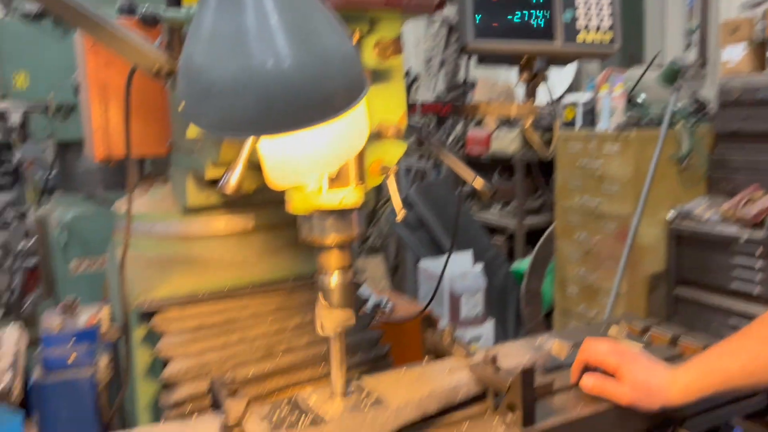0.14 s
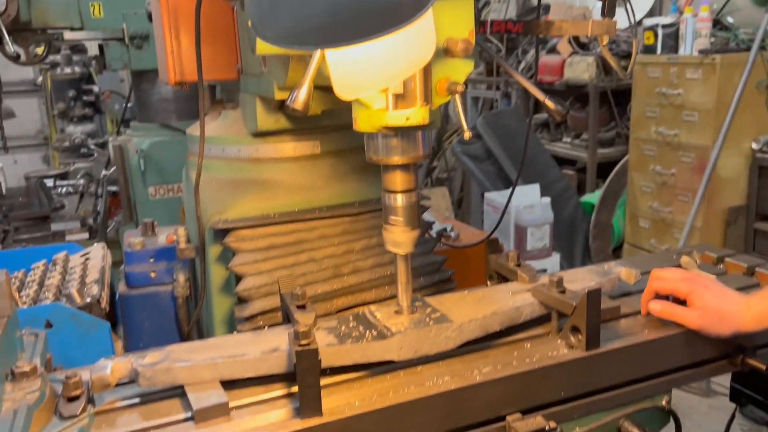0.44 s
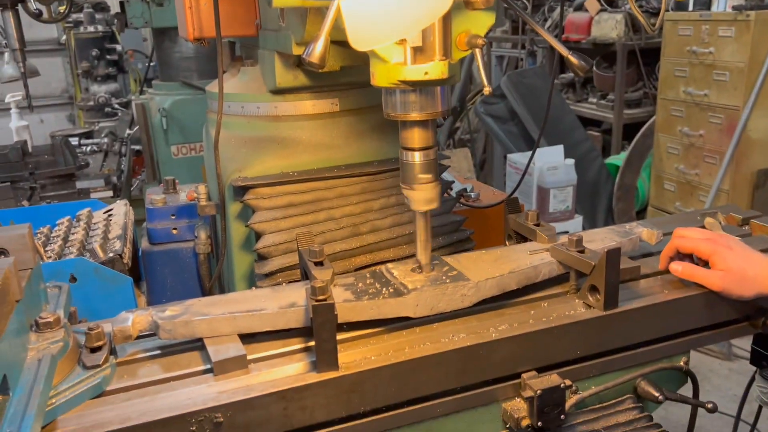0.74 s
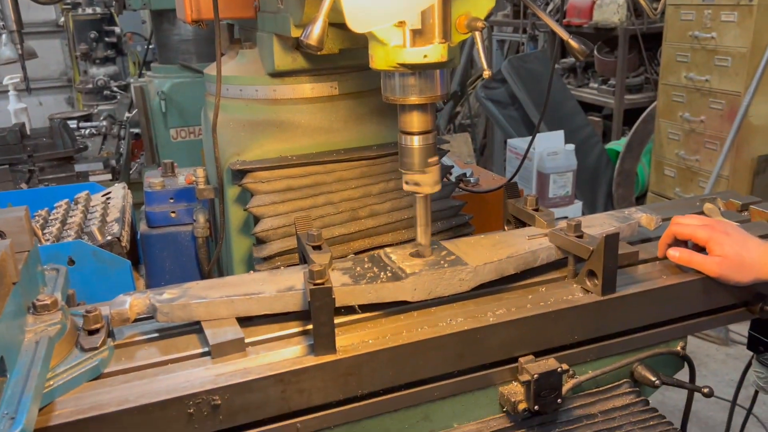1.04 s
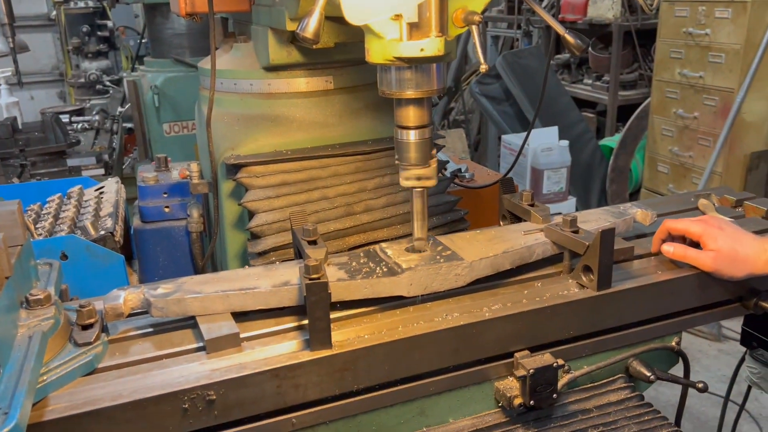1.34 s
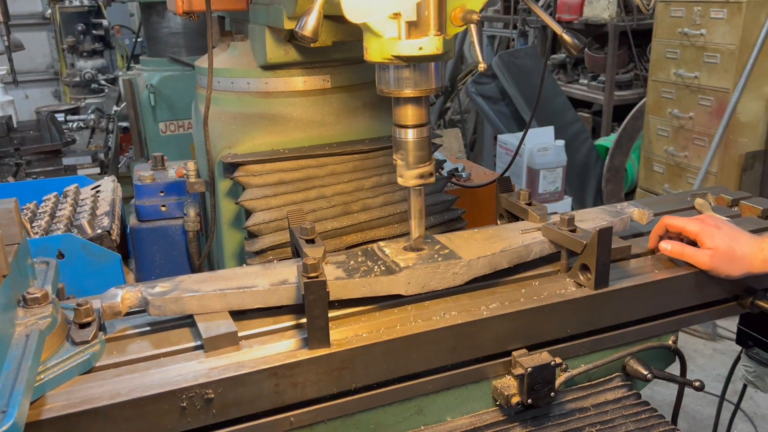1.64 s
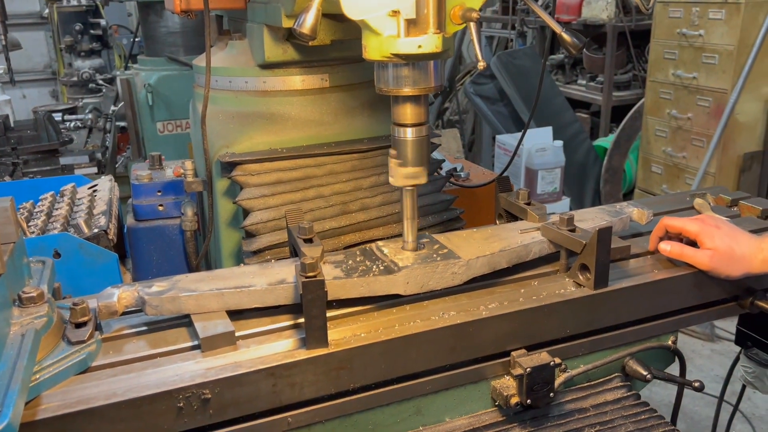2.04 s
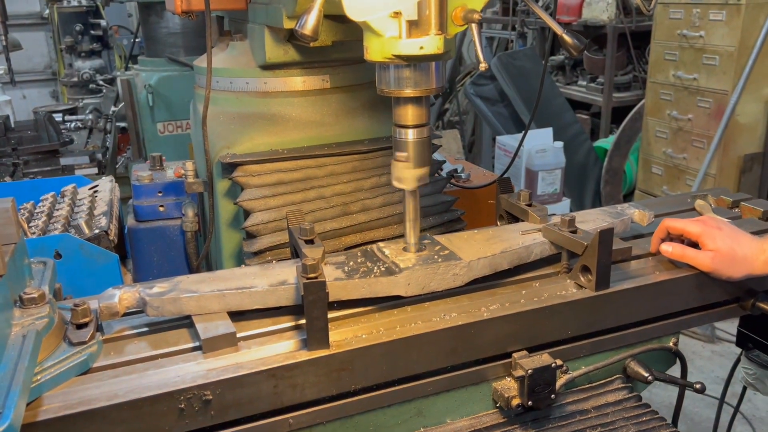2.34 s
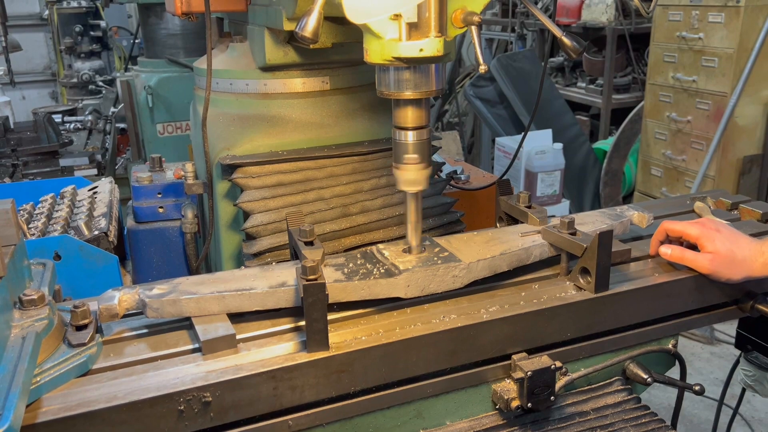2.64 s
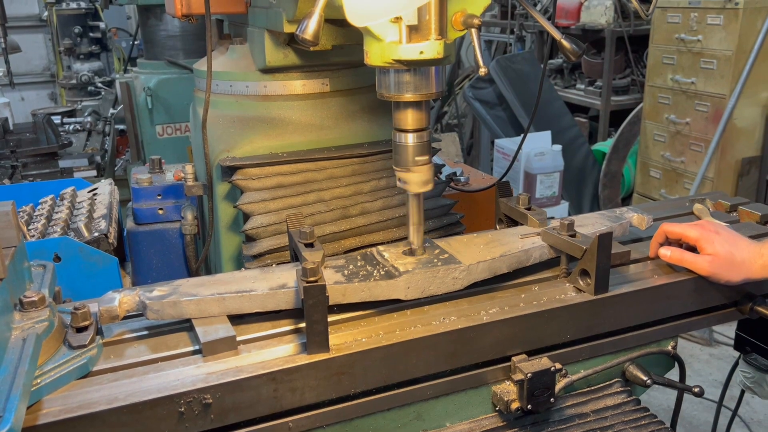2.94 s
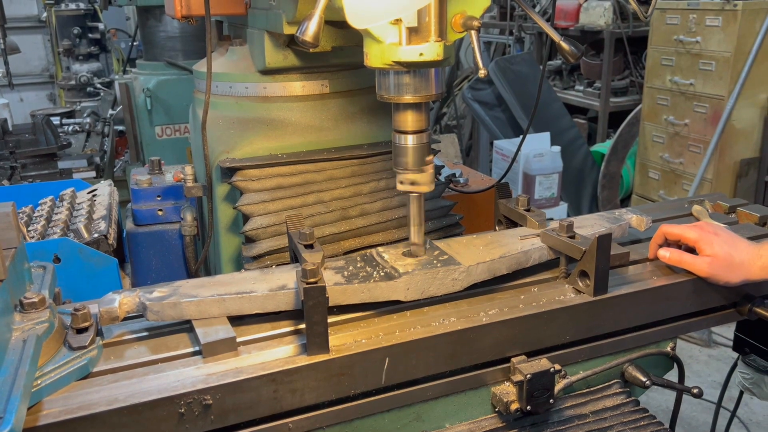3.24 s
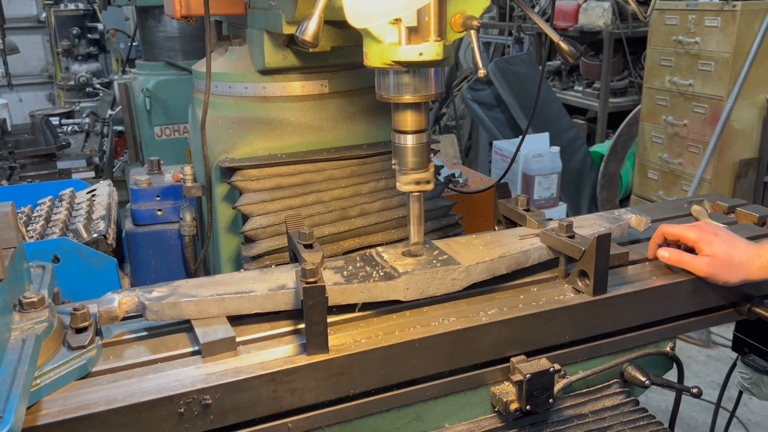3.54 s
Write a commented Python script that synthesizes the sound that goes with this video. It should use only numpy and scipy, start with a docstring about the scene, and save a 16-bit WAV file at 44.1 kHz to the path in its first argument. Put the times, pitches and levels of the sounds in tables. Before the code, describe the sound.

A milling machine whines and rumbles steadily, about a metre from a phone microphone in a workshop. Its belt ticks lightly and a rasp swells regularly, while a chip breaks off a metal bar with one tiny, sharp click.

```python
"""A vertical milling machine in a workshop, a metre from a phone with two microphone ports.
It runs throughout: gears and belt cogs whine over a rumble that partly repeats with each belt turn,
each slow drive beat and every second spindle turn, and a rasp swells with that beat. A few whines
shift as the phone swings and settles. From 0.2 s the belt ticks twice a turn. A chip snaps off the
bar at 1.5 s, and a much fainter one at 2.1 s."""
import sys
import numpy as np
from scipy import signal
from scipy.fft import rfft, irfft
from scipy.io import wavfile
from scipy.ndimage import uniform_filter1d

SR = 44100
rng = np.random.default_rng(int(sys.argv[2]) if len(sys.argv) > 2 else 0)


def store_wav(level_fs):
    """Save 16-bit WAV to argv[1]."""
    pcm = np.round(np.clip(np.atleast_2d(level_fs), -1, 1) * 32767)
    wavfile.write(sys.argv[1], SR, pcm.T.astype(np.int16))


N = 163170
RASP_PEAK_S, RASP_DB = .5, 3.5  # the rasp's tones and noise swell together


def undb(db):
    """Decibels to amplitude."""
    return 10 ** (np.asarray(db) / 20)


def on_log(table, column, hz):
    """Read a column of a table along a log frequency axis."""
    table = np.array(table, float)
    return np.interp(np.log(np.maximum(hz, 1)), np.log(table[:, 0]), table[:, column])


def walk(rate_hz):
    """Random levels held 1 / rate_hz seconds and smoothed twice; spread near 1."""
    held = np.repeat(rng.standard_normal(int(N * rate_hz / SR) + 2), repeats=16)
    slewed = uniform_filter1d(uniform_filter1d(held, size=16), size=16)
    return 1.3 * np.interp(np.arange(N) * 16 * rate_hz / SR, np.arange(len(held)), slewed)


def tones(table):
    """Stereo tones that waver slowly in level and phase and tremble a little, the high ones more."""
    t, out = np.arange(N) / SR, np.zeros((2, N))
    settled_s, drifts_s = 1.7, 2.3  # the phone's swing dies out; a last drift begins
    for hz, db, pan_db, lead, *shift_db in table:
        loose = np.sqrt(min(hz, 6000) / 2000)
        phase = 2 * np.pi * (hz * t + rng.random())
        phase += loose * (.3 * walk(rate_hz=4) + .12 * walk(rate_hz=40))
        tone = np.sqrt(2) * undb(db + 1.3 * loose * walk(rate_hz=4)) * np.exp(1j * phase)
        if shift_db:
            tone *= undb(np.interp(t, [0, settled_s, drifts_s, N / SR], [shift_db[0], 0, 0, shift_db[1]]))
        to_left = undb(pan_db / 2) * np.exp(.5j * lead)
        out[0] += (tone * to_left).imag
        out[1] += (tone / to_left).imag
    return out


def drive_beat(at_s, db, period_s=.664):
    """Gain that swings by db with the slow beat of the drive, plus a smaller swing at twice the rate."""
    turn = 2 * np.pi * (np.arange(N) / SR - at_s) / period_s
    return undb(db * (np.cos(turn) + .6 * np.cos(2 * turn)))


def drive_whine():
    """Shafts, gear teeth and belt cogs hum and whine at multiples of their turning rates."""
    # Tones of the machine: pitch_hz, level_db, left_minus_right_db, left_lead_rad
    motor = [(111.8, -38.5, -1, -0.12), (166.4, -46, -2, -0.15), (223.5, -45, 0, -0.044),
             (279.4, -41.5, -4, 0.19), (337.6, -46, -3, 0.54), (564, -55, 5, 0.5)]  # multiples of the motor shaft's turn
    gears = [(1216.8, -56, 18, 0.0), (1285.4, -33, -5, -0.9), (1357.6, -54, 8, 0.6), (2502.4, -60, 1, 0.6),
             (2639.0, -50, 0, 1.1), (3787.0, -64, 9, 0.7), (5077.8, -62, 9, 0.6), (5346.8, -63, 7, -0.5),
             (6358.4, -66, 4, -0.1), (6426.4, -63, -3, -0.9), (6495.4, -68, -3, 0.2)]  # gear mesh, its overtones and side tones
    cogs = [(324.5, -44, -7, .4), (364, -51, -3, 0.15), (423, -46, 7, 0.71), (431, -43, -8, 0.83),
            (522.3, -46.5, -1, 0.7), (528.2, -36.5, 2, 0.016), (869, -46.5, -3, .5), (857, -47, -1, .2),
            (1050, -47, 12, 0.26), (1578, -51, 7, 0)]  # multiples of the belt's turn
    spindle = [(3119.2, -61, 6, 1.4), (3430.8, -57, -3, 1.7), (5013.5, -65, 7, 2.7), (5638.4, -68, 4, -2.7),
               (6886.2, -65, 5, -.2), (7462.7, -67, -2, -.9), (7774.6, -67, 3, -1), (8133.8, -67, 2, -1.2),
               (8445.9, -62, 2, -1.2), (8681.1, -66, 2, -1.6), (9381.6, -67, 0, -3.14),
               (10299.5, -70, 0, 3.14), (12404.3, -72, 0, .2)]  # high multiples of the spindle's turn
    head = [(120.3, -58, -4, -0.4), (129.8, -50, -1, 0), (150.5, -47, -1, 0.2), (161.8, -51, -3, -0.5),
            (388, -43, -5, 0.2), (539.7, -41.5, 2, 0.4), (1954.6, -52, 2, .8), (2305.7, -59, 2, -.9),
            (2708.4, -55.5, 0, .7), (3636.2, -60, 4, 0), (3683, -58.5, 6, .6)]  # further hums and whines of the head
    rasping = [(1670.5, -51, 3, .9), (1673.2, -47, 1, .6), (1685.4, -50, 1, .4), (1727.8, -49.5, 2, .9),
               (1730.8, -49, 3, .3), (1785, -54, 0, .2)]  # a cluster that swells with the rasp
    # The same columns, then: extra_at_start_db, extra_at_end_db
    shifting = [(2570.7, -49, 4, -.6, -9, 1), (2807.8, -56, 1, 1.9, -4, 2), (2971.9, -58, -1, .8, -1, 6),
                (5141.5, -54, 5, -.8, 6, 0), (5209.5, -59, 5, .5, -10, 0)]  # whines that change as the phone swings and settles
    dipping = [(5277.4, -57.5, 8, .1, -5, 0), (5302.6, -59, 9, 0, -11, 0)]  # two spindle whines that drop out together
    whine = tones(motor + gears + cogs + spindle + head + shifting)
    whine += drive_beat(at_s=.58, db=-5) * tones(dipping)
    return whine + drive_beat(RASP_PEAK_S, RASP_DB) * tones(rasping)


def rattle():
    """Spectrum of broad noise: part fresh, part echoing itself one period earlier."""
    # Noise that repeats with each belt turn, each slow drive beat and every second spindle turn:
    # period_s, memory_ratio, centre_hz, width_octaves, power_share, throb_hz, throb_depth_ratio
    repeats = [(.15755, 0.86, 460, 1.1, 0.57, 6.347, 0.16), (.66205, 0.68, 1710, 0.098, 0.32, 55.89, 0.23),
               (.08335, 0.82, 8100, 1.04, 0.28, 12., 0.09), (.66205, 0.69, 160, 0.74, 0.5, 55.89, 0.46)]
    rasp_row = 1
    hz, t = np.arange(N // 2 + 1) * SR / N, np.arange(N) / SR
    patterns, fresh_share = 0, 1
    for row, (period, memory, centre_hz, octaves, share, throb_hz, depth) in enumerate(repeats):
        band_share = share * np.exp(-.5 * (np.log2(np.maximum(hz, 1) / centre_hz) / octaves) ** 2)
        comb = np.sqrt(1 - memory ** 2) / (1 - memory * np.exp(-2j * np.pi * hz * period))
        repeating = irfft(rfft(rng.standard_normal(N)) * comb, N)
        if row == rasp_row:
            repeating *= drive_beat(RASP_PEAK_S, RASP_DB)
        throb = 1 + depth * np.sin(2 * np.pi * throb_hz * t)
        patterns += np.sqrt(band_share) * rfft(repeating * throb)
        fresh_share -= band_share
    flicker = undb(1.26 * walk(rate_hz=12))
    return patterns + np.sqrt(np.clip(fresh_share, 0, 1)) * rfft(flicker * rng.standard_normal(N))


def stereo_image(direct, diffuse):
    """Two spectra become left and right: the direct with a phase lead, the diffuse in opposition."""
    # Stereo image by frequency; left and right are opposed around 9-11 kHz:
    # frequency_hz, likeness_ratio, left_lead_rad, left_minus_right_db
    image = [(30, .85, 0, -1.2), (70, .97, 0, -1.5), (200, .95, .1, -2), (500, .87, .3, -.5),
             (900, .8, .4, -.3), (1500, .5, .3, .5), (2000, .62, .3, 1.5), (3000, .5, 1.1, .5),
             (3800, .45, .7, 3.5), (4600, .25, .3, 3), (5300, .45, -.3, 4), (6700, .35, -.3, 1.5),
             (7600, .7, -.8, 3), (8500, .75, -1.3, 1.2), (9200, .995, -3.14, 0), (10900, .995, -3.14, 0),
             (11400, .5, -4.4, 0), (12600, .96, -6.2, 0), (14200, .97, -6.4, -1.5), (15400, .92, -8.4, 0)]
    hz = np.arange(len(direct)) * SR / N
    likeness = on_log(image, 1, hz)
    to_left = undb(on_log(image, 3, hz) / 2) * np.exp(.5j * on_log(image, 2, hz))
    mid = direct * np.sqrt((1 + likeness) / 2)
    side = diffuse * np.sqrt((1 - likeness) / 2)
    return irfft(np.array([(mid + side) * to_left, (mid - side) / to_left]), N)


def machine_rumble(level_db=-25):
    """The rattle, shaped into rumble and hiss, rises and falls a little with the load."""
    # Spectrum of the rumble and hiss, cut off steeply above 15.5 kHz: frequency_hz, relative_density_db
    body = [(25, -42), (50, -28.5), (80, -18.5), (110, -18.5), (200, -15), (290, -13), (330, -8.5),
            (430, -3.5), (480, -11), (530, -5.5), (650, -13), (870, -10.5), (1150, -14.5), (1450, -15),
            (1700, -15), (1950, -18.5), (2200, -26.5), (2650, -22.5), (3200, -30), (3650, -27), (4100, -33),
            (4700, -34.5), (5250, -28.5), (5900, -35), (6450, -30.5), (7000, -36.5), (7550, -31.5),
            (8000, -36.5), (8500, -31.5)]
    treble = [(9000, -37), (9500, -36), (10800, -38), (11300, -42), (12500, -40), (13800, -46),
              (15500, -43), (15900, -60), (16400, -95)]
    # Load on the machine: time_s, gain_db
    load = [(0, -0.5), (.8, -1), (1.6, -0.6), (2.4, 0), (3.1, 0.26), (3.7, 0.7)]
    colour = undb(on_log(body + treble, 1, np.arange(N // 2 + 1) * SR / N))
    rumble = stereo_image(rattle() * colour, rattle() * colour)
    load_db = np.interp(np.arange(N) / SR, *np.array(load).T)
    return rumble * undb(level_db + load_db) / np.sqrt(np.mean(rumble ** 2))


def add(track, start_s, sound, peak_db):
    """Lay a sound on the track at a given peak level."""
    i = int(start_s * SR)
    sound = sound[:N - i]
    track[i:i + len(sound)] += sound * undb(peak_db) / np.abs(sound).max()


def belt_ticks(centre_hz=7540, spread_hz=110, width_hz=870, t60_s=.058):
    """The belt ticks twice a turn: fading spits of noise in a treble band that moves a little each time."""
    # The first tick of each turn: start_s, peak_db
    ticks = [(0.1925, -41), (0.3945, -40), (0.5477, -35), (0.7063, -37), (0.8649, -34), (1.0196, -33),
             (1.1772, -37), (1.3289, -37), (1.492, -36), (1.6496, -35), (1.8073, -37), (1.9644, -30),
             (2.1217, -28), (2.2792, -33), (2.4374, -52), (2.5995, -33), (2.7521, -33), (2.9093, -32),
             (3.0674, -32), (3.2306, -34), (3.3787, -34), (3.5369, -36)]
    second_after_s, second_db = .068, -42  # the second tick, mostly fainter
    t, track = np.arange(int(t60_s * SR)) / SR, np.zeros(N)
    fade = np.exp(-np.log(1000) * t / t60_s)
    for (start_s, db), chance in zip(ticks, rng.standard_normal((len(ticks), 3))):
        first = (start_s, db, chance[0])
        second = (start_s + second_after_s, second_db + 2 * chance[1], chance[2])
        for at_s, peak_db, detune in (first, second):
            hz = centre_hz + spread_hz * detune
            band = signal.butter(2, [hz - width_hz / 2, hz + width_hz / 2], "bandpass", fs=SR, output="sos")
            add(track, at_s, signal.sosfilt(band, rng.standard_normal(len(t)) * fade), peak_db)
    spectrum = rfft(track)
    return stereo_image(direct=spectrum, diffuse=.3 * spectrum)


def chip_snaps(rise_s=.0002):
    """Each chip snapping off the bar rings the same few short modes, the low ones a moment later."""
    # Chips breaking off: start_s, peak_db
    chips = [(1.5432, -10), (2.1306, -30)]
    # What a chip rings with: pitch_hz, relative_db, t60_s, delay_s
    modes = [(14900, 0, .0028, 0), (13300, -4, .002, 0), (10700, -5, .002, 0), (7600, -11, .002, .0001),
             (4900, -12, .003, .0003), (2050, -7, .006, .0006)]
    t, track = np.arange(SR // 100) / SR, np.zeros(N)
    for start_s, peak_db in chips:
        ring = 0
        for hz, mode_db, t60_s, delay_s in modes:
            age = np.maximum(t - delay_s, 0)
            envelope = (1 - np.exp(-age / rise_s)) * np.exp(-np.log(1000) * age / t60_s)
            ring += undb(mode_db) * envelope * np.sin(2 * np.pi * (hz * age + rng.random()))
        add(track, start_s, ring, peak_db)
    return np.array([track, np.roll(track, 1)])  # the right port hears it one sample late


def scene():
    """The running mill from a metre away, left and right."""
    ticks, chips = belt_ticks(), chip_snaps()
    return drive_whine() + machine_rumble() + ticks + chips


def record(dry):
    """The phone cuts the top steeply."""
    top_hz = 16600
    return signal.sosfilt(signal.ellip(10, .2, 80, top_hz, fs=SR, output="sos"), dry)


dry = scene()
out = record(dry)
store_wav(out)
```